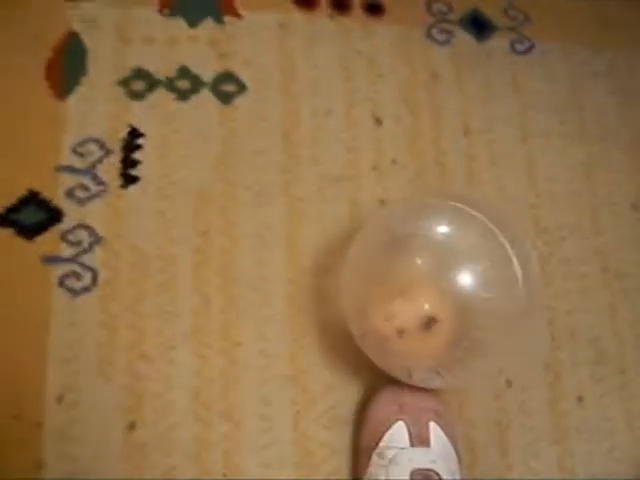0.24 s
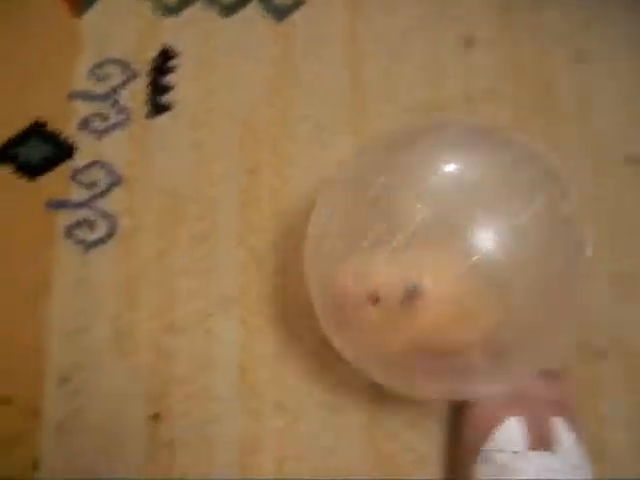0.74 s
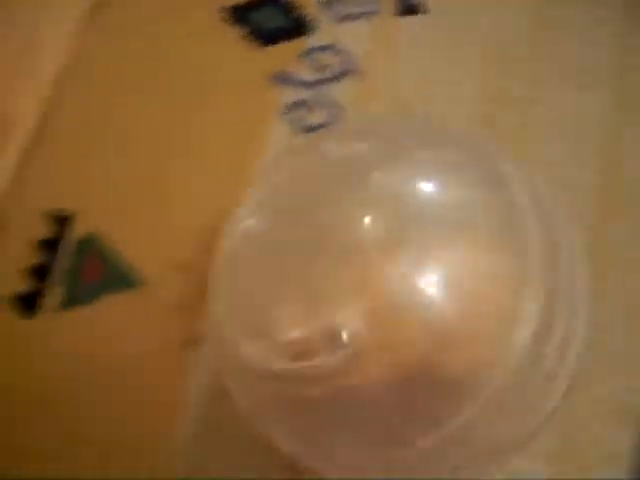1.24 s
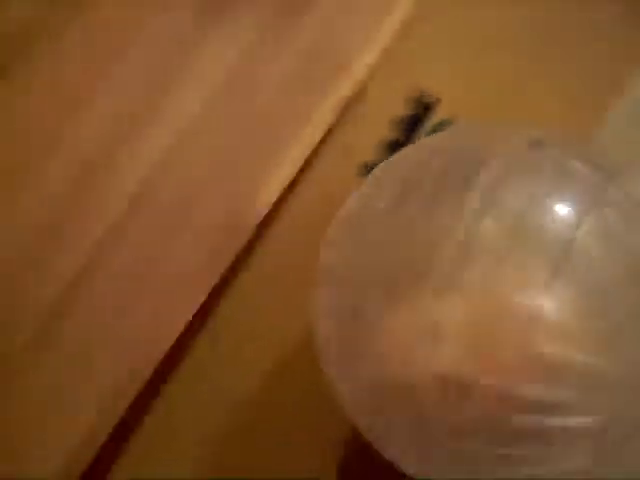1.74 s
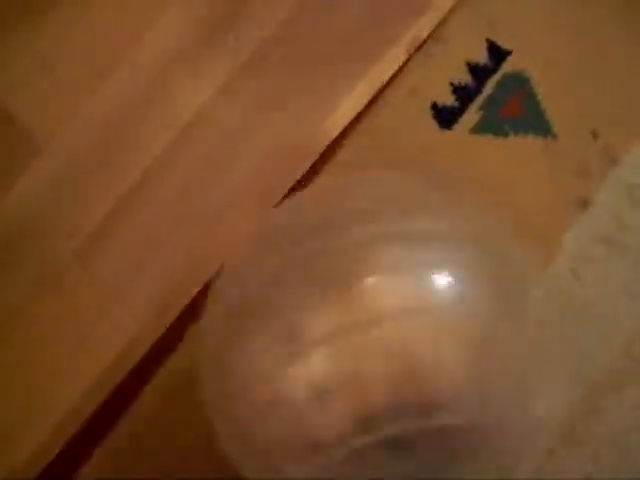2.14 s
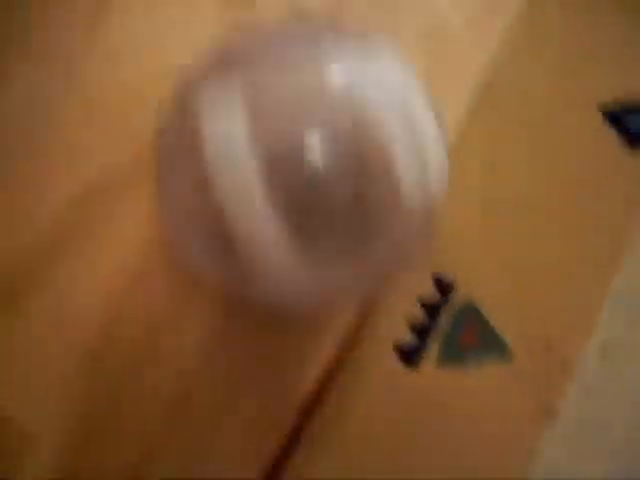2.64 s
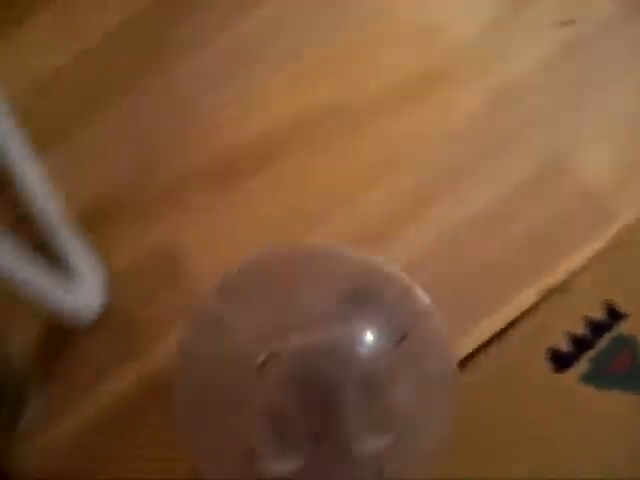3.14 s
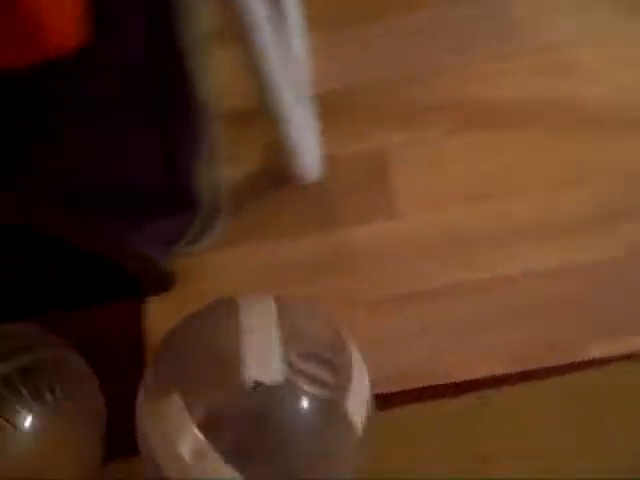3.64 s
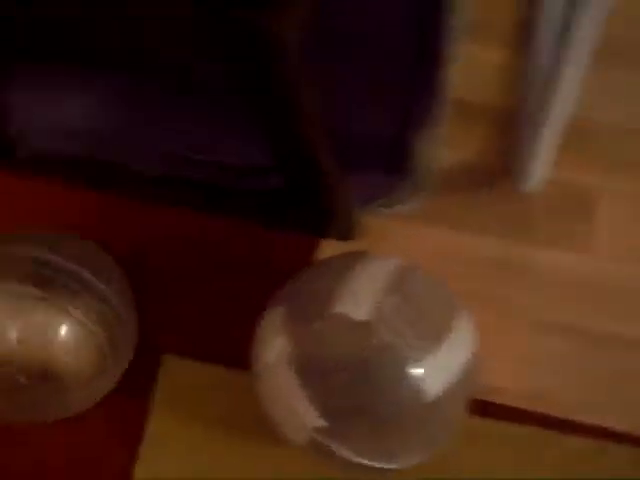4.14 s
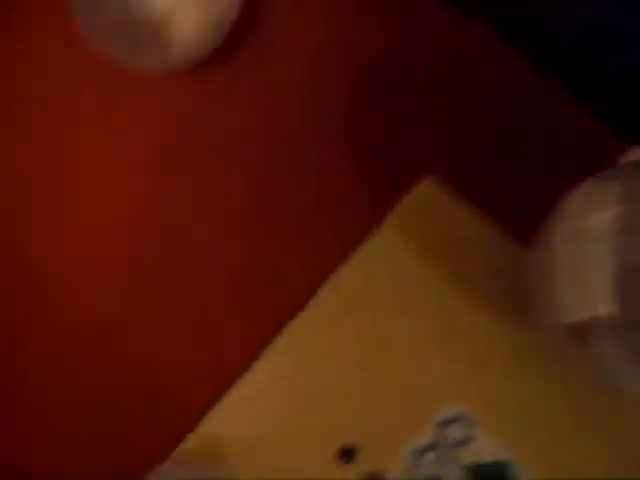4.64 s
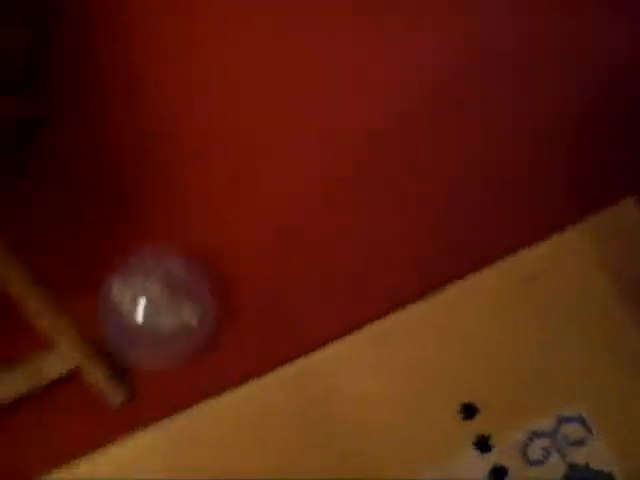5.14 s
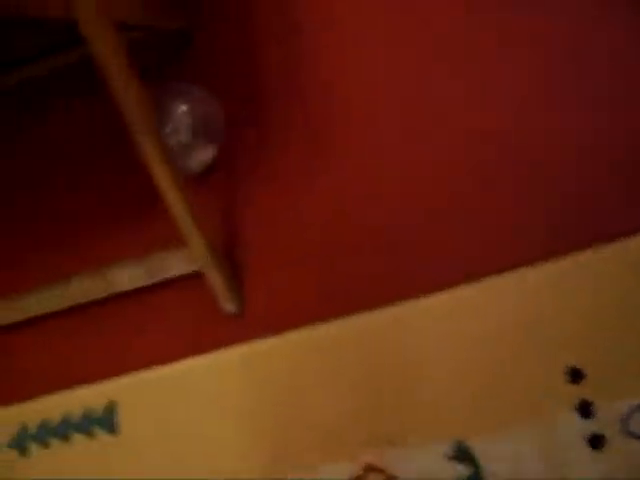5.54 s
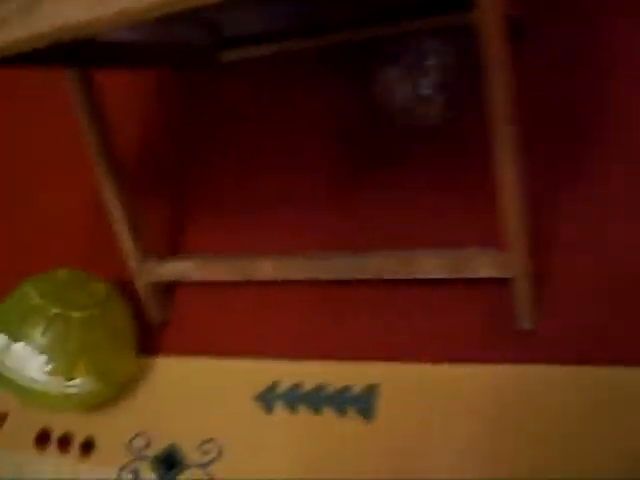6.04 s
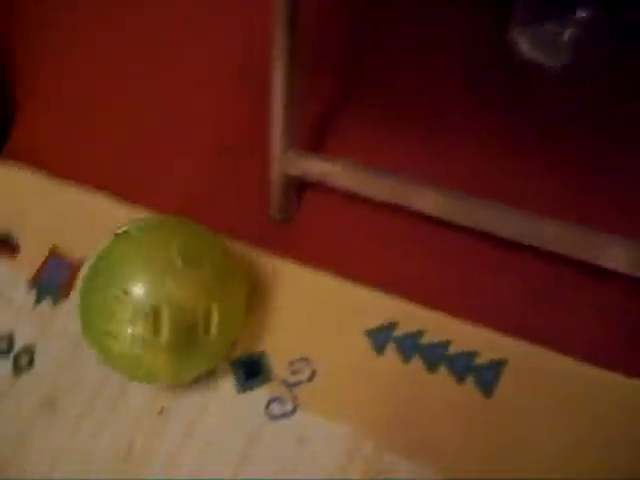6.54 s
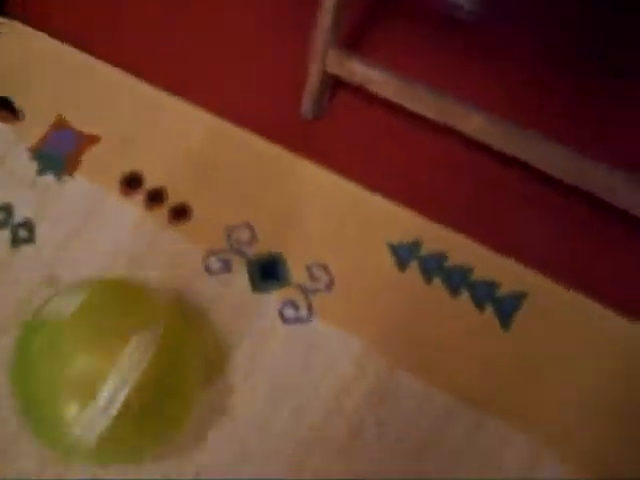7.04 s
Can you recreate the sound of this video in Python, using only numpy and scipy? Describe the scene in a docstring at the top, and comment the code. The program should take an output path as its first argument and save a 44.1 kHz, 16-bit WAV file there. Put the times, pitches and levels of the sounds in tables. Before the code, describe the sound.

Close, in a small furnished room, hamsters run in hollow plastic balls. Light claw ticks and a grainy rattle build, a smaller clack comes first, then a very loud cracking knock near two seconds. Busy pattering and soft floor booms follow, fading to sparse taps and scuffs, then two more hard clacks late on.

```python
"""A small furnished room with rugs on a wooden floor, where hamsters run in hollow plastic balls.
The balls clack, as cracks that ring the shell over a hollow knock, and bump softly as filtered noise.
Claws tick as short bright bursts; loose bits rattle as crowds of random grains; scuffs are swells of noise.
Soft steps boom as low sliding tones, and a faint low pulse ticks in even runs close to the microphone."""
import sys
import numpy as np
from scipy import signal
from scipy.fft import rfft, irfft, next_fast_len
from scipy.io import wavfile

SR = 44100
rng = np.random.default_rng(int(sys.argv[2]) if len(sys.argv) > 2 else 0)


def transcribe(u):
    """Save the signal u as a 16-bit wav file named by the first command-line argument.

    u: samples, shape (n,) or (channels, n), limited to [-1, 1]; the rate is SR.
    q: integer samples, one column per channel.
    """
    v = np.clip(np.atleast_2d(u).T, -1, 1)
    q = np.round(v * 32767).astype(np.int16)
    wavfile.write(sys.argv[1], SR, q)


N = 321489
TAIL = np.arange(2 ** 14) / SR  # time after a blow, in seconds
BRISK_DB = -60.5  # rattle level of a brisk roll

# Resonances of the plastic shell. Each row: frequency in Hz, half-power width in Hz, level in dB.
SHELL_MODES = [(1580, 230, -3.5), (1878, 80, -16.5), (2145, 59, -1), (2340, 81, -6.5), (2582, 61, -3),
               (2720, 93, -6.5), (2884, 41, 2.5), (3065, 50, -0.5), (3320, 74, -4.5), (3595, 46, -1.5),
               (4000, 320, -4), (4430, 130, -1), (5030, 370, -5), (5480, 140, -14), (5760, 120, -2.5),
               (6320, 120, -31), (6925, 110, -31.5)]
# Colour of a blow on the plastic, ahead of its resonances. Each row: frequency in Hz, gain in dB.
CRACK_COLOUR = [(40, -12.5), (150, -10), (330, 0.5), (700, 1), (1100, -1.5), (2000, 3), (3000, 4),
                (5000, -1), (7200, -2), (8500, -12)]


def amp(db):
    """Decibels to gain."""
    return 10 ** (np.asarray(db) / 20)


def unit(x):
    """Scale to rms 1."""
    return x / np.sqrt(np.mean(x ** 2) + 1e-20)


def along(points, hz):
    """Read (Hz, value) points on a log frequency axis."""
    point_hz, value = np.transpose(points)
    return np.interp(np.log(hz + 1), np.log(point_hz + 1), value)


def add(track, s, sound):
    """Mix a sound into the track at s seconds."""
    start = max(round(s * SR), 0)
    track[start:start + len(sound)] += sound[:max(N - start, 0)]


def colour(x, gain):
    """Causal (minimum-phase) filter with the given gain over frequency."""
    size = 2 * next_fast_len(len(x) // 2 + 4096)
    log_gain = np.log(np.maximum(gain(np.fft.rfftfreq(size, 1 / SR)), 1e-6))
    cepstrum = irfft(log_gain)
    # folding the cepstrum forward in time gives the minimum phase
    cepstrum[1:size // 2] *= 2
    cepstrum[size // 2 + 1:] = 0
    response = np.exp(rfft(cepstrum))
    return irfft(rfft(x, size) * response)[:len(x)]


def noise(spectrum):
    """Steady noise of rms 1 with the given spectrum."""
    return unit(colour(rng.standard_normal(N), lambda hz: amp(along(spectrum, hz))))


def fade(attack, t60):
    """Envelope of a blow: a rise with time constant attack, then a 60 dB decay in t60 (seconds)."""
    return (1 - np.exp(-TAIL / attack)) * amp(-60 * TAIL / t60)


def burst(gain, attack, t60):
    """A crowd of dying modes, as coloured noise with the energy of its envelope."""
    envelope = fade(attack, t60)
    crowd = colour(envelope * rng.standard_normal(len(TAIL)), gain)
    return unit(crowd) * np.sqrt(np.mean(envelope ** 2))


def hump(hz, centre_hz, q):
    """Gain of one broad resonance."""
    return 1 / np.hypot(1, q * (hz / centre_hz - centre_hz / (hz + 1)))


def shell(hz, between_db):
    """Gain of the ball: its resonances over a bed of weaker ones."""
    modes = sum(amp(db) ** 2 / (1 + (2 * (hz - mode_hz) / width_hz) ** 2)
                for mode_hz, width_hz, db in SHELL_MODES)
    return np.sqrt(amp(between_db) ** 2 + modes)


def room_tail():
    """Diffuse answer of the room with energy 1: noise dying at each pitch's own rate, new at every call."""
    # Reverberation of the room. Each row: frequency in Hz, 60 dB decay time in seconds.
    decay_times = [(100, 0.5), (500, 0.2), (1200, 0.24), (3000, 0.22), (8000, 0.18)]
    hz, t, z = signal.stft(rng.standard_normal(len(TAIL)), SR, nperseg=256)
    dying = z * amp(-60 * t / along(decay_times, hz)[:, None])
    tail = signal.istft(dying, SR, nperseg=256)[1][:len(TAIL)]
    tail = tail * (1 - np.exp(-(TAIL / 0.002) ** 2))  # the walls take a moment to answer
    return tail / np.linalg.norm(tail)


def in_room(x, wet_db):
    """The direct sound plus its room tail."""
    return x + amp(wet_db) * signal.fftconvolve(x, room_tail())[:len(x)]


def rattle_level(s):
    """Level of the rattle in dB at times s: how hard the balls rattle as they roll."""
    # The course of the rolling. Each row: time in seconds, level in dB.
    roll_course = [(0,-65),(.24,-65),(.42,-76.5),(.79,-69.5),(.93,-61.5),(1.4,-61),(1.58,-54.5),(2.05,-57),(2.22,-66),(2.38,-57),(2.6,-58),(2.75,-87),(2.79,-56),(3.2,-63),(3.32,-56.5),(3.47,-57),(3.58,-54),(3.8,-67),(4.1,-66),(4.4,-71),(5.1,-65.5),(5.8,-75.5),(7.29,-79)]
    return np.interp(s, *np.transpose(roll_course))


def rolling():
    """Small grains scratch and tumble in a turning ball, which rubs the floor as it goes."""
    # Colour of the grains, ahead of the shell. Each row: frequency in Hz, gain in dB.
    grain_colour = [(500, -35), (900, -22.5), (1500, -7), (2450, -6), (3000, -5.5), (7200, -1.5),
                    (7900, -1), (9000, -16)]
    # Colour of the ball rubbing the floor. Each row: frequency in Hz, gain in dB.
    rub_colour = [(60, -16), (200, 5), (450, -1.5), (900, -1), (1800, -15.5), (3500, 3), (7000, -30)]
    rattle_db = rattle_level(np.arange(N) / SR)
    chance, size = rng.random(N), rng.standard_normal(N)
    # faster rolling shakes loose more contacts a second
    rate = 150 * amp(0.65 * (rattle_db - BRISK_DB))
    contacts = (chance < rate / SR) * amp(7.1 * np.clip(size, -2, 2)) / np.sqrt(rate)
    # every contact sets the dense shell modes going for a few milliseconds
    power = np.abs(signal.fftconvolve(contacts ** 2, fade(attack=0.00016, t60=0.029) ** 2)[:N])
    gain = lambda hz: amp(along(grain_colour, hz)) * shell(hz, between_db=3.5)
    grains = colour(np.sqrt(power) * rng.standard_normal(N), gain)
    rattle = in_room(amp(rattle_db) * unit(grains), wet_db=-9.5)
    return rattle + amp(rattle_db - 12.5) * noise(rub_colour)


def room_quiet():
    """The quiet of the room: a steady faint noise, mostly low."""
    # Spectrum of the quiet. Each row: frequency in Hz, density in relative dB per Hz.
    quiet_spectrum = [(20, -3.5), (45, -0.5), (100, -5.5), (250, -10.5), (700, -18.5), (2000, -22.5),
                      (7000, -21), (9000, -31.5)]
    return amp(-69) * noise(quiet_spectrum)


def patter():
    """Light taps of running feet, as rows for ticks(): sparse, soft and dull when the ball is slow."""
    slots = 400  # each holds one tap at most
    slot_s = N / SR / slots
    chance, offset = rng.random((2, slots))
    size = rng.standard_normal(slots)
    s = (np.arange(slots) + offset) * slot_s
    effort_db = rattle_level(s) - BRISK_DB
    # at a brisk roll: 12 taps a second around -39.5 dB, with a low ring of -12.5 dB
    db = -39.5 + 0.63 * effort_db + 1.5 * np.clip(size, -2, 2)
    low_db = -12.5 - 0.94 * effort_db
    taps_per_s = 12 * amp(0.7 * effort_db)
    return np.column_stack([s, db, low_db])[chance < slot_s * taps_per_s]


def bumps():
    """Soft contacts sound mostly the low body, with a little of the shell."""
    # Soft bumps of a ball. Each row: start in seconds, level in dB, centre of the body in Hz,
    # shell level in dB; fixed trims are added to both levels.
    soft_bumps = [(0.018,-49.5,750,-23), (0.791,-49.5,402,-11.5), (0.980,-36.5,773,-10.5),
                  (0.982,-39,270,-22), (1.891,-36,286,-25), (2.115,-38,463,-14.5), (2.58,-52,614,-27),
                  (3.154,-44.5,164,-27), (3.156,-49.5,304,-10), (4.012,-43.5,570,-7),
                  (4.204,-56.5,810.6,-28), (4.887,-54.5,509,-21), (4.96,-41.5,760,-1.5),
                  (5.013,-50,566,-10), (6.147,-57,917,-14), (6.534,-48.5,570,-20), (6.612,-57.5,584,-6),
                  (7.099,-46.5,930,-8.5)]
    out = np.zeros(N)
    rim_gain = lambda hz: amp(along(CRACK_COLOUR, hz)) * shell(hz, between_db=4.5)
    for s, db, centre_hz, shell_db in soft_bumps:
        body_gain = lambda hz: hump(hz, centre_hz, q=4.4) / np.hypot(1, (hz / 1300) ** 2)
        body = burst(body_gain, attack=0.0018, t60=0.029)
        rim = burst(rim_gain, attack=0.0014, t60=0.051)
        bump = amp(4.5) * body + amp(shell_db + 8.5) * rim
        add(out, s, amp(db - 2) * in_room(bump, wet_db=-4.0))
    return out


def ticks(taps):
    """Tiny hard contacts: short and bright, some ringing lower, each spot with its own colour."""
    # Colour of a claw on plastic, ahead of the shell. Each row: frequency in Hz, gain in dB.
    claw_colour = [(100, -26.5), (700, -11.5), (1500, -15.5), (3000, -7.5), (5000, -1), (7200, 7),
                   (8500, -2)]
    out = np.zeros(N)
    spots_hz = np.geomspace(1500, 8000, num=12)
    for s, db, low_db in taps:
        spot = np.column_stack([spots_hz, 2.5 * rng.standard_normal(len(spots_hz))])
        tilt = lambda hz: along([(2800, low_db + 18.5), (5500, 0)], hz) + along(spot, hz)
        gain = lambda hz: amp(along(claw_colour, hz) + tilt(hz)) * shell(hz, between_db=-6)
        tick = burst(gain, attack=.0003, t60=.026)
        add(out, s, amp(db - 7.5) * in_room(tick, wet_db=-8.0))
    return out


def pulses():
    """Each faint pulse is one dull dip of pressure with a small rebound; a run keeps an even pace."""
    # Even runs of pulses close to the microphone. Each row: start in seconds, end in seconds.
    pulse_runs = [(0.117,.45),(.482,0.87),(1.117,1.45),(2.384,3.11),(3.287,3.7),(3.785,4.12),(4.32,4.52),(4.621,5.2),(5.955,6.2),(6.488,6.82)]
    gap_s, peak_db, spread_db = .1335, -55, 1.5
    out = np.zeros(N)
    push = -np.sin(2 * np.pi * 95 * TAIL) * fade(attack=0.00073, t60=0.021)
    push = push / np.abs(push).max()
    for start, end in pulse_runs:
        for s in np.arange(start, end, gap_s):
            add(out, s, amp(peak_db + spread_db * rng.standard_normal()) * push)
    return out


def ring(attack):
    """The shell's own modes, struck at new strengths; a narrow resonance rings longer."""
    total = np.zeros(len(TAIL))
    for mode_hz, width_hz, db in SHELL_MODES:
        size_db, phase = rng.standard_normal(2)
        decay = np.exp(-np.pi * width_hz * TAIL)
        total += amp(db + size_db) * decay * np.sin(2 * np.pi * mode_hz * TAIL + np.pi * phase)
    return total * (1 - np.exp(-TAIL / attack))


def loud_burst(gain, attack, t60, wet_db):
    """A burst radiated all round: the walls return its mean colour, without the notches of one direction."""
    direct = burst(gain, attack, t60)
    return direct + amp(wet_db) * np.std(direct) * unit(colour(room_tail(), gain))


def clacks():
    """A hard blow cracks through the shell, rings it and makes the whole ball knock hollowly."""
    # Hard collisions. Each row: start in seconds, level in dB, hollow knock in dB, knock pitch in Hz,
    # tilt near 2 kHz in dB, treble tilt in dB, room in dB; fixed trims are added to the first two levels.
    collisions = [(0.2755,-19.5,-8.5,605,9,6.5,-0.5), (0.3321,-30,-8,608,0.5,-4,-5),
                  (1.887,-11,-16,490,-4,4,-8), (5.7427,-34.5,1.5,507,-1,-4,-5.5),
                  (5.7988,-15.5,-8.5,591,0,1.5,-4), (6.87,-12,-17.5,614,-1.5,5.5,-1),
                  (6.9411,-36.5,-2,582,-4,-13,-1), (6.9622,-35.5,-18.5,600,1,2,-2)]
    out = np.zeros(N)
    for s, db, knock_db, knock_hz, middle_db, treble_db, room_db in collisions:
        tilt = lambda hz: along([(900, 0.0066), (2000, middle_db), (3300, 0.017), (6500, treble_db)], hz)
        plastic = lambda hz: amp(along(CRACK_COLOUR, hz) + tilt(hz)) * shell(hz, between_db=-3.5)
        hollow = lambda hz: hump(hz, knock_hz, q=8.6) * hump(hz, knock_hz, q=1.26)
        crack = loud_burst(plastic, attack=0.0027, t60=0.031, wet_db=room_db)
        knock = loud_burst(hollow, attack=0.00085, t60=0.018, wet_db=room_db)
        blow = crack + amp(-15.5) * ring(attack=0.0013) + amp(knock_db + 3.0) * knock
        add(out, s - .001, amp(db + .5) * blow)  # the contact begins just before its peak
    return out


def steps():
    """A foot sets the boards booming, lower as the weight settles, and a low room mode hums on after it."""
    # Steps on the boards. Each row: start in seconds, level in dB, settled boom in Hz.
    footfalls = [(0.802,-50,75), (0.862,-64,63.3), (0.93,-60,69.7), (1.14,-62.5,65.5), (1.616,-54,69.8),
                 (2.073,-47.5,88), (2.169,-51.5,99), (2.464,-55,96), (2.772,-52.5,94.3), (3.329,-54,92)]
    pad_colour = [(30, -20), (90, -9.5), (220, -16.5), (600, -29.5), (2000, -58.0)]  # (Hz, dB)
    out = np.zeros(N)
    for s, db, boom_hz in footfalls:
        pitch_hz = boom_hz * (1 + 0.2 * np.exp(-TAIL / 0.035))
        boom = fade(attack=0.0042, t60=0.36) * np.sin(2 * np.pi * np.cumsum(pitch_hz) / SR)
        hum = fade(attack=0.0051, t60=0.56) * np.sin(2 * np.pi * 153 * TAIL)
        pad = burst(lambda hz: amp(along(pad_colour, hz)), attack=0.0034, t60=0.22)
        add(out, s, amp(db) * (boom + amp(-6.0) * hum + amp(-7.5) * pad))
    return out


def ball_air():
    """The air in the large ball hums on at one pitch for a moment after a knock."""
    # Hums of the enclosed air. Each row: start in seconds, level in dB.
    air_hums = [(1.889, -40.5), (2.126, -55)]
    air_hz, air_t60_s = 513, 0.2
    out = np.zeros(N)
    hum = fade(attack=.002, t60=air_t60_s) * np.sin(2 * np.pi * air_hz * TAIL)
    for s, db in air_hums:
        add(out, s, amp(db) * hum)
    return out


def scuffs():
    """Plastic brushing on pile: a soft wash that swells and dies."""
    # A ball brushing along the rug. Each row: start in seconds, length in seconds,
    # level in dB ahead of the swell, centre in Hz.
    brushes = [(4.016, 0.23, -62, 1640), (4.32, 0.12, -60.5, 1600), (4.42, 0.17, -66, 1530),
               (4.701, 0.28, -67, 915), (5.505, 0.1, -69, 1525)]
    out = np.zeros(N)
    for s, length_s, db, centre_hz in brushes:
        swell = np.hanning(round(length_s * SR)) ** 0.41
        fibres = colour(rng.standard_normal(len(swell)), lambda hz: hump(hz, centre_hz, q=0.31))
        add(out, s, amp(db) * swell * unit(fibres))
    return out


def scene():
    """The balls, the steps, the pulses and the quiet of the room."""
    # The sharpest taps of claws on the shell. Each row: start in seconds, level in dB,
    # low ring in dB; fixed trims are added to both levels.
    sharp_taps = [(0.0734,-40,-19),(0.179,-34.5,-34),(0.7282,-40.5,-17),(0.849,-32.5,-19),(0.9278,-39.5,-19),(1.1038,-36,-0.5),(1.262,-31,-15),(1.3266,-34,-16.5),(1.483,-30.5,-19),(2.3462,-36.5,-4),(2.4916,-28.5,-11),(2.6272,-33,-17),(2.7771,-31,-14.5),(2.8775,-30.5,-14.5),(2.9317,-33,-11),(3.0768,-29.5,-11.5),(3.376,-29.5,-16),(3.5033,-25,-16.5),(3.567,-24.5,-14),(3.626,-32.5,-18),(3.909,-36.5,-17),(4.074,-29.5,-24),(5.1527,-27.5,-11.5),(5.3833,-37.5,-13.5),(5.4853,-32.5,-14),(6.133,-31,-10.5),(6.345,-47,8),(6.7135,-37,-0.5),(6.747,-40.5,-1),(6.781,-36,-8),(7.1642,-24.5,-11)]
    claws = ticks(sharp_taps) + ticks(patter())
    balls = rolling() + bumps() + claws + clacks() + ball_air() + scuffs()
    background = room_quiet() + pulses() + steps()
    return (balls + background)[None]


def record(dry):
    """The microphone of a small camera: the treble rolls off, then stops at its band limit."""
    top_hz = 8500
    roll_off = lambda hz: amp(along([(7400, 1), (8100, -5.5), (8800, -4.5)], hz))
    return colour(dry[0], lambda hz: roll_off(hz) / np.hypot(1, (hz / top_hz) ** 40))[None]


dry = scene()
out = record(dry)
transcribe(out)
```